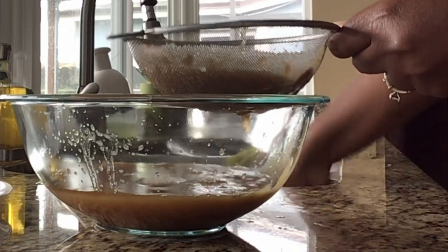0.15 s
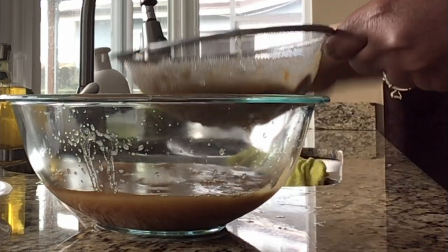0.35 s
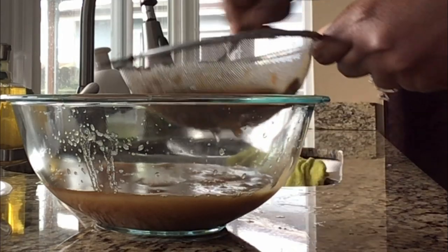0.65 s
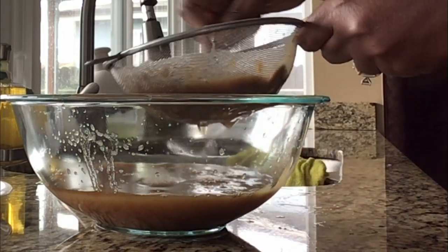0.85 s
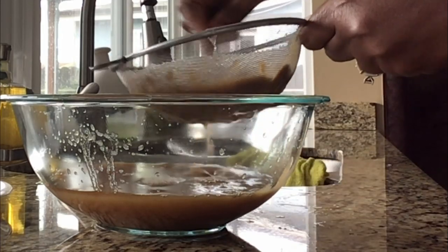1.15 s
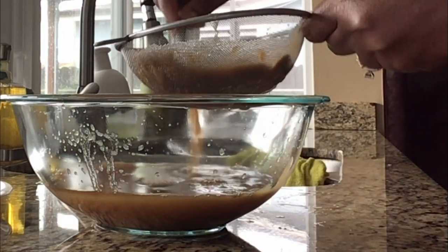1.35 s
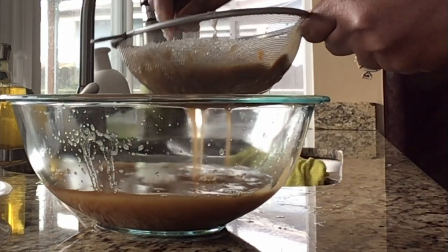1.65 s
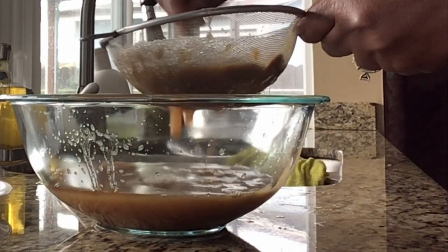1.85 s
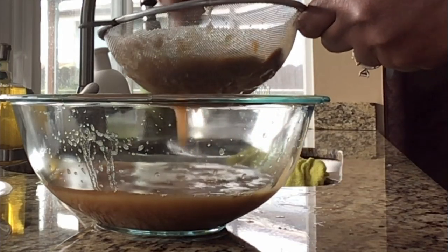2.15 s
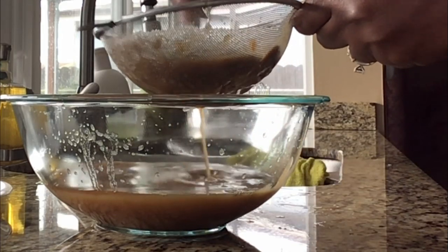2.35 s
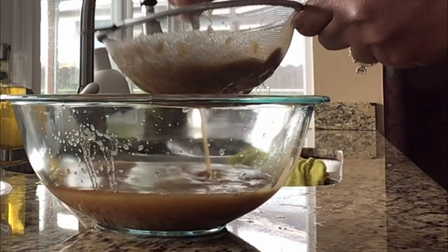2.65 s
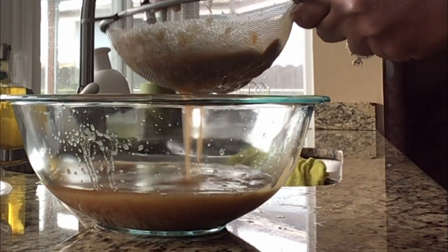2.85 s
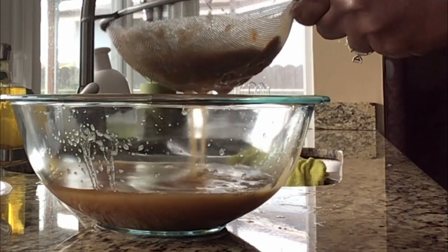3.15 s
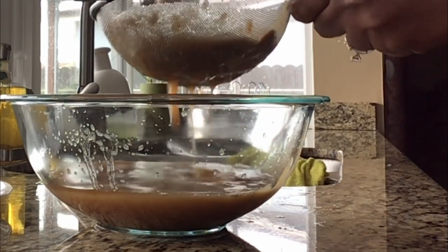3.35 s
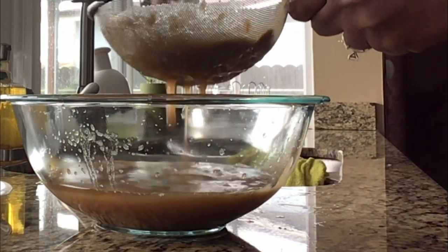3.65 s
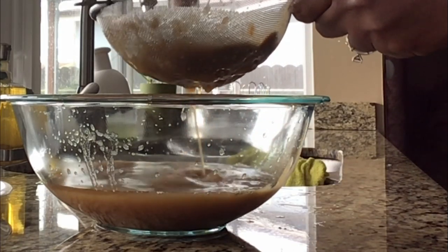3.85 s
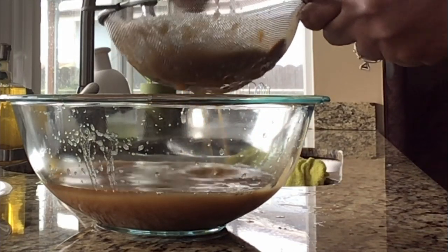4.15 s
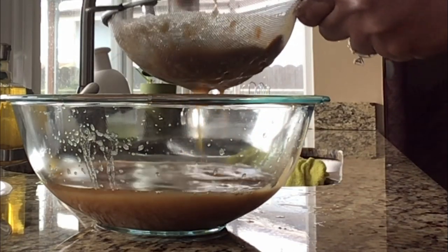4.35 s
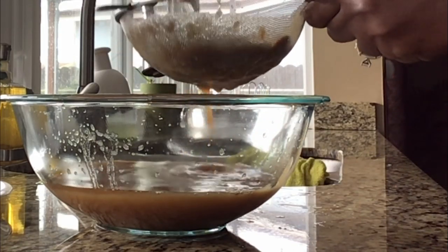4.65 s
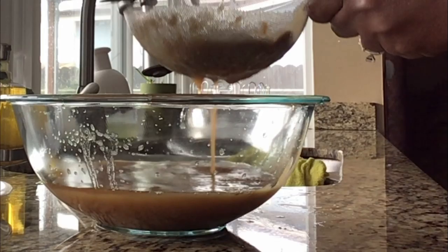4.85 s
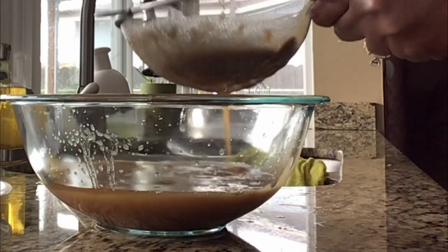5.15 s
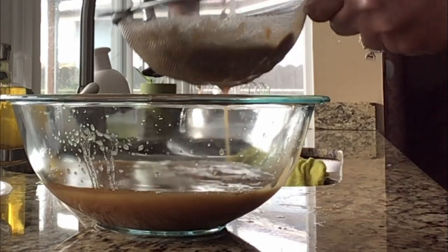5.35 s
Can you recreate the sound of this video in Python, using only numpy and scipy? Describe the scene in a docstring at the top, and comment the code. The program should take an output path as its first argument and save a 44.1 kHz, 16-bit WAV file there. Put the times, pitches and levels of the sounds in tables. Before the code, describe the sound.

A heavy rumble and jolting thumps near a kitchen counter, then a spoon taps and scrapes a metal strainer while thick juice plops into a glass bowl.

```python
"""Kitchen, one microphone. At first something heavy on rollers, perhaps a drawer, rumbles and jolts nearby:
noise through cabinet and steel runner resonances, with low thumps. Then a spoon works pulp round a steel mesh
strainer, three strokes a second: ringing modes tap the rim, gritty noise scrapes the mesh, and thick juice plops
into a glass bowl as bubbles of rising pitch, these the driest in the room. An appliance drones under it all."""
import sys
import numpy as np
from scipy import signal
from scipy.fft import rfft, irfft, next_fast_len
from scipy.io import wavfile
from scipy.ndimage import uniform_filter1d

SR = 44100
rng = np.random.default_rng(int(sys.argv[2]) if len(sys.argv) > 2 else 0)


def bounce(signal):
    """Save signal as a 16-bit WAV file at the path given by the first command-line argument."""
    frames = np.transpose(np.atleast_2d(signal))
    limited = np.clip(frames, -1, 1)
    pcm = np.round(limited * 32767).astype(np.int16)
    wavfile.write(sys.argv[1], SR, pcm)


N = 243431

# Appliance drone, spectrum: [f/Hz, relative level/dB per Hz]
DRONE_SPECTRUM = [(15, -64), (25, -40), (32, -23), (34, -36), (41, -19), (65, -1.5), (82, -12.5),
                  (97, -13.5), (145, -10), (205, -22.5), (221, -20.5), (242, -18.5), (292, -16),
                  (394, -30.5), (500, -34), (650, -33), (1100, -120)]
# Deep part of the drone, swollen while the floor shakes: [t/s, level/dB]
DEEP_DRONE_LEVEL = [(0.0, -37), (0.12, -52.5), (0.2, -30), (0.38, -39.5), (0.63, -35), (0.85, -39.5),
                    (1.23, -41), (1.34, -32.5), (1.57, -48.5), (2.2, -46.5), (2.57, -48.5), (2.9, -46.5),
                    (3.9, -46.5), (4.1, -46.5), (4.84, -52), (5.52, -46.5)]
# Faint high whistles: [f/Hz, width/Hz, relative level/dB]
WHISTLES = [(9900, 620, 3), (11100, 13, 14), (12500, 71, 3), (13400, 30, 2), (14500, 37, 8)]
# Hiss of room and microphone, spectrum: [f/Hz, relative level/dB per Hz]
AIR_SPECTRUM = [(240, -81), (400, 7.5), (1090, -4), (1760, 0.5), (1960, -8), (2250, -3), (4240, -7),
                (9470, -8), (10200, -28), (14400, -11.5), (16000, -13)]
# Decay of the kitchen's reverberation: [f/Hz, t60/s]
KITCHEN_DECAY = [(60, 0.14), (200, 0.39), (1000, 0.46), (10000, 0.26)]
# Steady rolling between jolts: [t/s, strength/dB before the trim of each part]
ROLLING = [(0.1, -71), (0.16, -34), (0.19, -21.5), (0.3, -35.5), (0.41, -29), (0.48, -23.5), (0.7, -27),
           (0.9, -21), (1.03, -27.5), (1.29, -16), (1.366, -20.5), (1.42, -60)]
# Jolts of the rollers: [t/s, rattle level/dB, grind level/dB]
ROLLER_JOLTS = [(0.189, -35, -30), (0.3178, -35.5, -25.5), (0.4406, -35, -26.5), (0.555, -41, -28.5),
                (0.66, -43, -29), (0.727, -51, -38), (0.8206, -45, -31), (0.905, -42, -33),
                (0.986, -40.5, -30), (1.0654, -44, -34), (1.131, -49.5, -39), (1.215, -46, -33),
                (1.2764, -69, -37), (1.335, -72, -47)]
# Cabinet resonances: [f/Hz, width/Hz, relative level/dB]
CABINET_MODES = [(103, 14.7, -4.5), (159.8, 11.7, 1), (183.3, 10.2, 0), (244.3, 44, -2), (272, 20, 2),
                 (360, 19, -17.5)]
# Steel runner resonances: [f/Hz, width/Hz, relative level/dB]
RUNNER_MODES = [(4800, 54, 10), (6960, 82, 11), (8380, 43, 8.5), (9000, 60, 9.5), (11500, 32, 6.5)]
# Grind of the rollers, spectrum: [f/Hz, relative level/dB per Hz]
GRIND_SPECTRUM = [(190, -21), (330, -2.5), (409, -9.5), (534, -6.5), (584, -10.5), (892, -20),
                  (1050, -18.5), (1130, -46), (1500, -23), (1950, -46), (3300, -120)]
# Rattle of the rollers, spectrum: [f/Hz, relative level/dB per Hz]
RATTLE_SPECTRUM = [(710, -39), (1200, 3.5), (1400, -10), (1730, -1), (1980, -5), (4750, -6.5), (5240, -9.5),
                   (8720, -10.5), (16000, -18)]
# Thumps of the cabinet: [t/s, level/dB, f/Hz]
CABINET_THUMPS = [(0.188, -7, 211.6), (0.204, -5, 144), (0.24, -14, 135), (0.328, -18, 160),
                  (0.455, -13, 118), (0.472, -12, 269), (0.564, -13, 113.5), (0.599, -11, 165),
                  (0.664, -14.5, 123), (0.827, -13.5, 167.6), (0.905, -15, 187), (0.982, -33, 200),
                  (1.008, -7.5, 149), (1.084, -9.5, 145), (1.148, -13, 264), (1.169, -14, 148),
                  (1.216, -7, 158), (1.248, -8, 138), (1.299, -3, 157.8), (1.334, -16.5, 189.5),
                  (1.352, -23, 166)]
# Pings: touches of glass or steel, and at 0.025 s and 0.56 s early lumps of juice: [t/s, level/dB, f/Hz, t60/s,
# chatter share/0-1]
PINGS = [(0.025, -52, 2745, 0.27, 0.5), (0.411, -39.5, 1714, 0.45, 0.32), (0.474, -41, 1720, 0.29, 0.26),
         (0.56, -37.5, 2270, 0.062, 0.1), (3.718, -47.5, 1400, 0.63, 0.2)]
# Lumps of juice: [t/s, level/dB, f/Hz, t60/s]
JUICE_PLOPS = [(1.435, -53, 3460, 0.1), (1.488, -50, 2290, 0.15), (1.6, -22.5, 761, 0.07),
               (1.654, -37, 807, 0.029), (1.795, -29, 830, 0.017), (1.909, -44, 2644, 0.089),
               (2.14, -47.5, 730, .1), (2.192, -48.5, 2525, 0.12), (2.352, -44, 900, 0.025),
               (2.385, -39.5, 2313, 0.14), (2.436, -31, 665, 0.1), (2.563, -47.5, 2290, .05),
               (2.649, -45, 2115, 0.13), (3.074, -46, 3660, 0.042), (3.103, -47.5, 1520, 0.09),
               (3.461, -45, 3120, 0.043), (3.46, -46, 1780, 0.034), (3.548, -46, 3650, 0.079),
               (3.685, -43, 3390, 0.074), (3.706, -33, 920, 0.015), (3.838, -48.5, 2450, .054),
               (3.914, -63, 2220, 0.11), (3.996, -48, 2570, 0.094), (4.021, -45.5, 2430, 0.084),
               (4.021, -46, 1730, 0.072), (4.175, -48, 2240, 0.059), (4.194, -42, 724, 0.044),
               (4.284, -42, 2120, 0.074), (4.457, -53, 2210, 0.069), (4.556, -46.5, 1874, 0.11),
               (4.711, -36, 2667, .076), (4.754, -44.5, 1214, 0.09), (5.058, -36.5, 591, 0.156),
               (5.367, -43.5, 2390, 0.11), (5.49, -48, 730, 0.1)]
# Spoon dragged over the mesh: [t/s, length/s, mesh hiss level/dB, slop level/dB, squelch level/dB]
MESH_DRAGS = [(1.461, 0.046, -54.5, -67, -71), (1.527, 0.054, -55.5, -59, -76),
              (1.656, 0.29, -62, -68.5, -67.5), (1.756, 0.094, -58, -60, -69),
              (2.036, 0.12, -70, -63.5, -67.5), (2.13, 0.061, -55, -66, -63.5),
              (2.329, 0.16, -54, -64, -63.5), (2.507, .05, -75, -88, -74), (2.64, 0.14, -54, -60.5, -64.5),
              (2.932, 0.076, -53.5, -64, -67.5), (3.015, 0.08, -55, -63.5, -58),
              (3.217, 0.048, -71, -65, -67), (3.295, 0.052, -49.5, -60.5, -58),
              (3.524, 0.13, -53, -66, -66.5), (3.632, 0.08, -75, -66, -55.5),
              (3.814, 0.053, -53, -62, -61.5), (3.894, 0.035, -50, -60, -59.5),
              (4.079, 0.06, -55.5, -65, -68), (4.17, 0.025, -51.5, -57.5, -56), (4.253, .02, -67, -73, -63),
              (4.38, 0.036, -57.5, -62, -69), (4.44, 0.059, -52, -61, -59.5),
              (4.632, 0.097, -62, -68, -67.5), (4.719, 0.046, -50.5, -58.5, -61),
              (4.814, 0.014, -58.5, -83, -84), (4.919, 0.037, -64, -67, -74),
              (5.041, 0.11, -54, -61.5, -61.5), (5.18, 0.085, -65, -69, -74), (5.36, 0.096, -66, -76, -68),
              (5.41, 0.12, -59.5, -67, -66.5)]
# Hiss of the dragged mesh, spectrum: [f/Hz, relative level/dB per Hz]
DRAG_SPECTRUM = [(1760, -45), (3000, -3), (4200, -3), (5370, -0.5), (5800, -6), (8700, 0), (10700, -4.5),
                 (13700, -3.5), (16000, -29)]
# Resonances of the mesh wires: [f/Hz, width/Hz, relative level/dB]
MESH_MODES = [(5150, 41, 8.5), (6670, 260, 9), (8200, 300, -5.5), (9040, 480, 7.5), (13300, 210, -14)]
# Spoon on rim: [t/s, level/dB, lowest ring f/Hz, then relative levels/dB of lowest ring, middle pair, top ring]
RIM_TAPS = [(0.802, -36.5, 5330, -11, -5, -8), (0.818, -37, 5430, -10, -9, -22),
            (0.85, -36.5, 5200, -3.5, -8.5, -42), (1.4335, -34.5, 5000, -32, -19.5, -33),
            (1.4868, -39, 4386, 0, -6.5, -34), (1.6024, -40.5, 4360, -11, -12, -12),
            (1.663, -46, 4530, -20, -14, -25), (1.773, -36.5, 4950, -5.5, -12, -34),
            (1.7868, -34, 4530, -0.5, -8.5, -30), (1.804, -35.5, 5060, -8, -21, -28),
            (1.929, -36.5, 5390, -26, -43, -32), (2.0141, -33, 4780, -14, -16, -31),
            (2.0497, -31, 4540, -12.5, -4.5, -16), (2.3173, -34.5, 4560, -16, -16, -28),
            (2.3505, -30, 4810, -12.5, -28, -27), (2.3843, -35.5, 5110, -6.5, -11, -13),
            (2.401, -35, 5240, -6, -20, -26), (2.536, -35, 4840, -23, -23, -28),
            (2.6447, -33.5, 4570, -11, -3.5, -4), (2.692, -32, 5700, -20, -27, -24),
            (2.7428, -37, 4780, -10, -12, -23), (3.0725, -34, 4510, -13, -25, -35),
            (3.1035, -34.5, 4700, -14, -27, -34), (3.1589, -31.5, 4520, -19, -38, -38),
            (3.2254, -33.5, 4630, -9.5, -5.5, -31), (3.2622, -35.5, 4800, -11, -10, -22),
            (3.3588, -24.5, 5160, -15, -21, -28), (3.459, -37.5, 4960, -13.5, -30, -34),
            (3.5228, -32, 5230, -22, -33, -29), (3.5469, -28, 5245, -4, -9, -9),
            (3.5718, -43, 5460, -17, 1, -19), (3.644, -28.5, 4820, -14, -18, -28),
            (3.6815, -25, 4600, -16, -26, -31), (3.802, -34.5, 5560, -19, -14.5, -26),
            (3.857, -41, 5350, -1, -1, -28), (3.9914, -40.5, 4430, -28, -22, -8),
            (4.0188, -36.5, 4960, -30, -21, -19), (4.0905, -39.5, 4670, -6, -8, -17),
            (4.117, -40, 5300, -5.5, -10, -28), (4.2757, -56, 4530, -29, -6, 5),
            (4.376, -35.5, 4580, -13, -11, -12), (4.556, -41, 5600, -14, -21, -16),
            (4.6406, -39, 5500, -28, -27, -16), (4.6662, -42, 5300, -9, -20, -32),
            (4.8373, -52, 5530, -18, -1.5, -28), (5.171, -37, 5360, -8.5, -9, -16),
            (5.1943, -31, 4420, -20, -22, -25), (5.214, -46, 5410, -1, -20, -25),
            (5.356, -49, 4630, -29, -5, -4), (5.408, -35.5, 4840, -16.5, -18, -29)]
# Upper rings of the spoon: [f/Hz before the shift by the grip, width/Hz]
SPOON_RINGS = [(7680, 690), (9560, 54), (13500, 860)]
# Crack of wire at a tap, spectrum: [f/Hz, relative level/dB per Hz]
CRACK_SPECTRUM = [(1760, -15), (3000, -2.5), (4200, -1), (4600, 4), (5800, -1), (9400, -5), (10300, -22),
                  (14500, -17), (16000, -57)]

DRONE_DB, AIR_DB = -55.5, -65.5
GRIND_DB, RATTLE_DB = -25.5, -33.5  # relative to the rolling strength
JOLT_BOOM_DB = 10.5  # boom of a jolt over its grind
JOLT_BLUR = 0.0059  # a jolt's rise lengthens by this many seconds per second elapsed
THUMP_T60_S = 0.089
SPLAT_SHARE = 0.33  # wet splat against bubble, 0-1
SWELL_CYCLES_PER_S = 52.5  # cycles of swelling per second of t60: long-lived bubbles swell over more
BUBBLE_RISE_HZ = 198  # rise in pitch over one t60
MESH_RISE_S, MESH_T60_S, PULP_RISE_S, PULP_T60_S = 0.021, 0.21, 0.03, 0.17
GRIP_DB = 3.5  # chance tilt between the middle pair of rings
BAND_LIMIT_HZ = 15950


def amp(db):
    """Amplitude factor of a level in dB."""
    return 10 ** (np.asarray(db) / 20)


def unit(x):
    """x scaled to rms 1."""
    return x / np.sqrt(np.mean(x ** 2) + 1e-20)


def along(points, hz):
    """Interpolate (f/Hz, value) points on a log axis."""
    f, values = np.transpose(points)
    return np.interp(np.log(hz + 1), np.log(f + 1), values)


def curves(rows):
    """One gain per sample for each dB column; near silent (-120 dB) outside the table."""
    s, *columns = np.transpose(rows)
    t = np.arange(N) / SR
    return [amp(np.interp(t, s, column, left=-120, right=-120)) for column in columns]


def filtered(x, response):
    """x shaped by a complex response of frequency."""
    n = x.shape[-1]
    m = next_fast_len(n + SR // 4)
    spectrum = rfft(x, m) * response(np.fft.rfftfreq(m, 1 / SR))
    return irfft(spectrum, m)[..., :n]


def modes(table):
    """Causal response of resonances in alternating polarity."""
    def response(f):
        total = 0
        for k, (centre, width, db) in enumerate(table):
            resonance = 1j * f * width / (centre ** 2 - f ** 2 + 1j * f * width)
            total = total + (-1) ** k * amp(db) * resonance
        return total
    return response


def spectrum(table):
    """Response that follows a table of levels."""
    return lambda f: amp(along(table, f))


def noise(response, grit_db=0., n=N):
    """Coloured noise of rms 1; grit makes its strength jump from millisecond to millisecond."""
    grit = np.repeat(rng.standard_normal(n // 32 + 1), 32)[:n]
    return unit(filtered(rng.standard_normal(n) * amp(grit_db * grit), response))


def patchy(x, patchy_db):
    """Random gain in small patches of frequency and time; rms 1."""
    z = signal.stft(x, nperseg=256)[2]
    field = uniform_filter1d(rng.standard_normal(z.shape), size=4, axis=0)
    field = uniform_filter1d(field, size=8, axis=1)
    return unit(signal.istft(z * amp(patchy_db * unit(field)), nperseg=256)[1][:len(x)])


def add_at(out, start_s, sound):
    """Lay a short sound into out at its start time."""
    out[round(start_s * SR):][:len(sound)] += sound


def bursts(times, dbs, rise, t60):
    """Sum of envelopes that swell fast and die away; later ones swell more softly."""
    env, t = np.zeros(N + SR), np.arange(SR // 2) / SR
    for s, db in zip(times, dbs):
        swell = 1 - np.exp(-t / (rise + JOLT_BLUR * s))
        add_at(env, s, amp(db - 60 * t / t60) * swell)
    return env[:N]


def background():
    """The appliance's drone with a faint mains overtone, faint whistles, and the hiss of room and microphone."""
    hum = amp(-63.5) * noise(modes([(242.5, 5.5, 0)]))
    deep = curves(DEEP_DRONE_LEVEL)[0] * noise(lambda f: amp(along(DRONE_SPECTRUM, f)) * (f < 90))
    upper = amp(DRONE_DB) * noise(lambda f: amp(along(DRONE_SPECTRUM, f)) * (f >= 90))
    whistles = amp(-72.5) * noise(modes(WHISTLES))
    air = amp(AIR_DB) * noise(spectrum(AIR_SPECTRUM))
    return deep + upper + hum + whistles + air


def kitchen(x):
    """Reverberation: each frequency of the room's answer dies at its own speed."""
    hz, t, z = signal.stft(rng.standard_normal(SR * 3 // 4), SR, nperseg=256)
    decay = amp(-60 * t / along(KITCHEN_DECAY, hz)[:, None])
    tail = signal.istft(z * decay, SR, nperseg=256)[1]
    delayed = np.pad(x, (300, 0))  # samples
    return signal.fftconvolve(delayed, tail / np.linalg.norm(tail))[:N]


def rollers():
    """Rolling shakes the cabinet and sings in the steel runner; jolts rattle and grind, and the cabinet thumps."""
    roll, = curves(ROLLING)
    s, rattle_db, grind_db = np.transpose(ROLLER_JOLTS)
    boom = bursts(s, grind_db + JOLT_BOOM_DB, 0.024, 0.11)
    shake = (amp(-6) * roll + boom) * noise(modes(CABINET_MODES))
    t = np.arange(SR // 4) / SR
    for start, db, hz in CABINET_THUMPS:
        env = amp(db - 60 * t / THUMP_T60_S) * (1 - np.exp(-t / 0.0038))
        add_at(shake, start, env * np.sin(2 * np.pi * hz * t))
    grind = amp(GRIND_DB) * roll + bursts(s, grind_db, 0.007, 0.21)
    rattle = amp(RATTLE_DB) * roll + bursts(s, rattle_db, 0.0017, 0.16)
    # the runner's ring evens out the jolts
    song = amp(-12.5) * rattle ** 0.85 * patchy(noise(modes(RUNNER_MODES)), patchy_db=2.0)
    grinding = grind * patchy(noise(spectrum(GRIND_SPECTRUM), grit_db=4), patchy_db=2.5)
    rattling = rattle * patchy(noise(spectrum(RATTLE_SPECTRUM), grit_db=2), patchy_db=3.5)
    return shake + song + grinding + rattling


def pings():
    """One ringing mode for each ping, of glass or steel or an early lump of juice, blurred where the contact
    chatters."""
    out, t = np.zeros(N + SR), np.arange(SR // 2) / SR
    for s, db, hz, t60, share in PINGS:
        chatter = noise(modes([(hz, 300, 0)]), n=len(t))
        tone = (1 - share) * np.sin(2 * np.pi * hz * t) + share * chatter
        add_at(out, s, amp(db - 60 * t / t60) * (1 - np.exp(-t / 0.0011)) * tone)
    return out[:N]


def plops():
    """Each lump traps a bubble that swells, rises in pitch and dies, inside a short wet splat."""
    out, t = np.zeros(N + SR), np.arange(SR // 5) / SR
    for s, db, hz, t60 in JUICE_PLOPS:
        cycles = t * (.97 * hz + BUBBLE_RISE_HZ / 2 * t / t60)  # low bubbles bend most for their pitch
        bubble = np.sin(2 * np.pi * cycles)
        splat = noise(modes([(hz, 0.14 * hz, 0)]), n=len(t))
        swell = (1 - np.exp(-t * hz / (SWELL_CYCLES_PER_S * t60))) ** 2
        mix = (1 - SPLAT_SHARE) * bubble + SPLAT_SHARE * splat
        add_at(out, s, amp(db - 60 * t / t60) * swell * mix)
    return out[:N]


def droplets(count):
    """Small random bubbles of rms 1, each some twenty cycles long and rising slightly in pitch."""
    start, size, pitch = rng.random((count, 3)).T
    hz, t = (1900 * 3.2 ** pitch)[:, None], np.arange(1400) / SR
    cycles = hz * t
    env = amp(-15 * size)[:, None] * np.exp(-cycles / 11) * (1 - np.exp(-cycles / 0.96))
    grains = env * np.sin(2 * np.pi * cycles * (1 + 0.00059 * cycles))
    at = (start * N).astype(int)[:, None] + np.arange(len(t))
    return unit(np.bincount(at.ravel(), grains.ravel(), N + SR)[:N])


def held(column, rise, t60):
    """Gain of all drags together, summed in power: each swells, holds for its length and dies away."""
    s, length, db = np.array(MESH_DRAGS)[:, [0, 1, column]].T[..., None]
    t = np.arange(0, N, 32) / SR - s  # one value per 32 samples
    env = amp(db - 60 * np.clip(t - length, 0, None) / t60) * np.clip(t / rise, 0, 1)
    return np.repeat(np.sqrt(np.sum(env ** 2, axis=0)), 32)[:N]


def scrape():
    """The spoon drags over resonant wires with a gritty hiss and squeezes pulp, which slops and squelches."""
    hiss_gain = held(column=2, rise=MESH_RISE_S, t60=MESH_T60_S)
    slop_gain = held(column=3, rise=PULP_RISE_S, t60=PULP_T60_S)
    squelch_gain = held(column=4, rise=PULP_RISE_S, t60=PULP_T60_S)
    wires = modes(MESH_MODES)
    mesh = noise(lambda f: amp(along(DRAG_SPECTRUM, f)) * (1 + 0.67 * abs(wires(f))), grit_db=1)
    hiss = hiss_gain * patchy(mesh, patchy_db=4.0)
    slop = slop_gain * patchy(noise(modes([(740, 600, 0)]), grit_db=2.5), patchy_db=0.7)
    pulp = noise(modes([(1665, 210, 0.16), (2550, 900, -0.8)]), grit_db=2.5)
    squelch = squelch_gain * patchy(pulp, patchy_db=7)
    drip = amp(-7) * squelch_gain * droplets(count=1000)
    return slop + squelch + drip + hiss


def taps():
    """A tap on the rim chatters for a moment, so the rings are fuzzy; a broad crack of wire goes with them."""
    out, t = np.zeros(N + SR), np.arange(SR // 5) / SR
    decay = amp(-60 * t / 0.1) + 0.67 * amp(-60 * t / 0.072)
    env = decay * (1 - np.exp(-t / 0.002))
    for s, db, low_hz, low_db, pair_db, top_db in RIM_TAPS:
        tilt_db = GRIP_DB * rng.standard_normal()
        ring_db = [low_db, pair_db + tilt_db, pair_db - tilt_db, top_db]
        shift = (low_hz / 4700) ** 0.12  # the grip shifts the upper rings a little, following the lowest ring
        rings = [(low_hz, 260)] + [(hz * shift, width) for hz, width in SPOON_RINGS]
        sound = amp(-21) * noise(spectrum(CRACK_SPECTRUM), grit_db=7, n=len(t))
        for (hz, width), level_db in zip(rings, ring_db):
            fuzz = 0.4 * noise(modes([(hz, width, 0)]), n=len(t))
            tone = 0.51 * amp(-60 * t / 0.23) * np.sin(2 * np.pi * hz * t)
            sound += amp(level_db) * (fuzz + tone)
        add_at(out, s, amp(db) * env * sound)
    return out[:N]


def scene():
    """All sources direct; rollers and spoon taps excite the room most, glass and juice little."""
    rolling, glass, juice, spoon = rollers(), pings(), plops(), taps()
    room = kitchen(amp(-9.5) * rolling + amp(-6.5) * spoon + amp(-20) * (glass + juice))
    return (background() + room + rolling + glass + juice + scrape() + spoon)[None]


def record(dry):
    """The microphone rolls off steeply in the deep bass and keeps nothing above its band limit."""
    return filtered(dry, lambda hz: (hz < BAND_LIMIT_HZ) / np.sqrt(1 + (42 / (hz + 1)) ** 8))


dry = scene()
out = record(dry)
bounce(out)
```